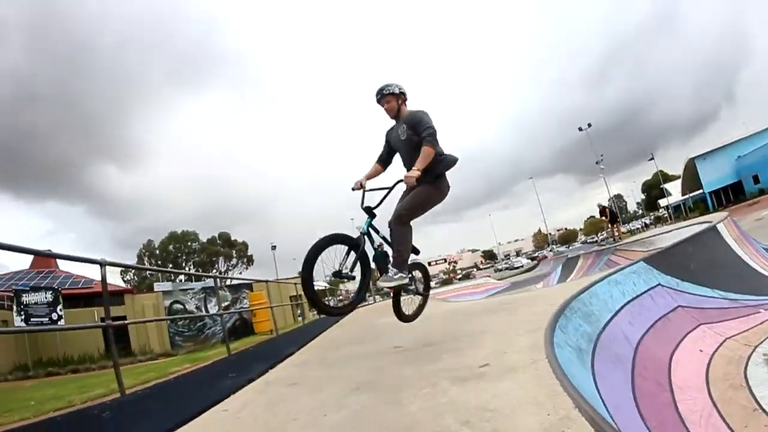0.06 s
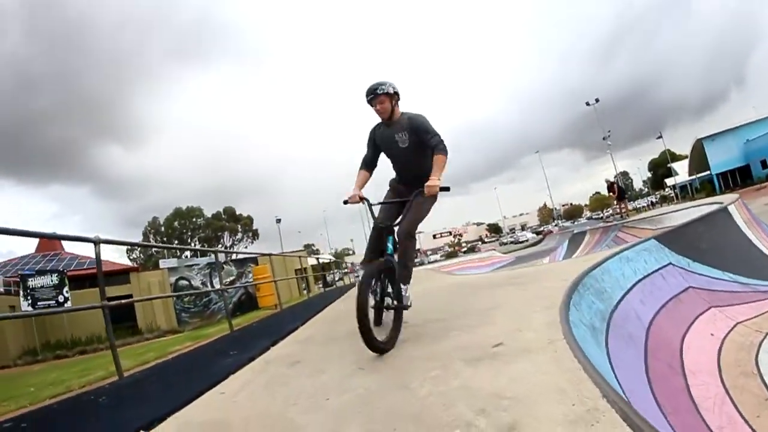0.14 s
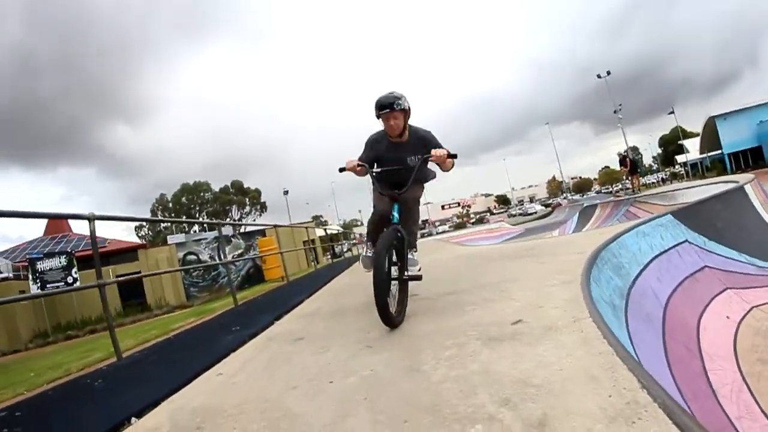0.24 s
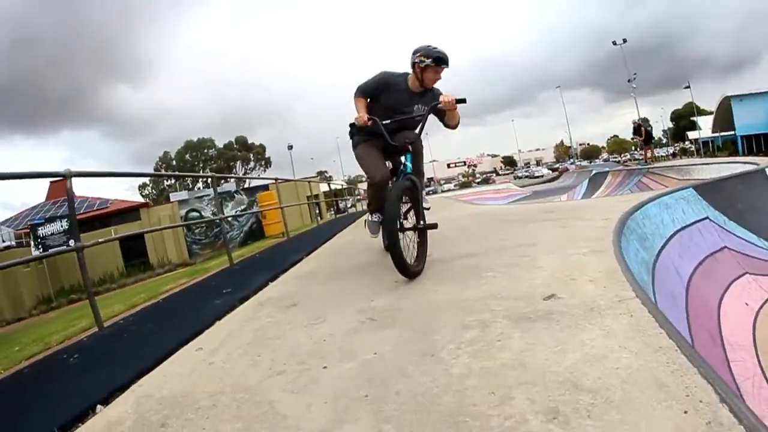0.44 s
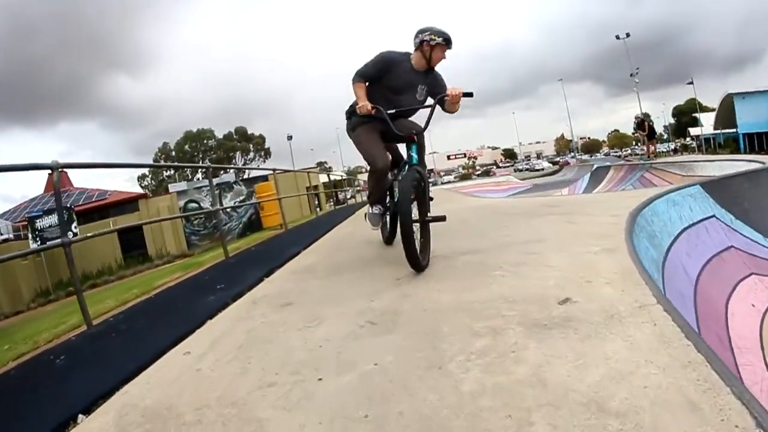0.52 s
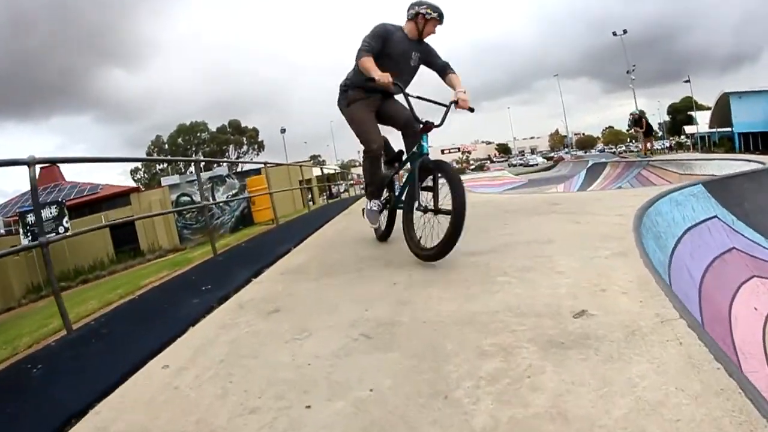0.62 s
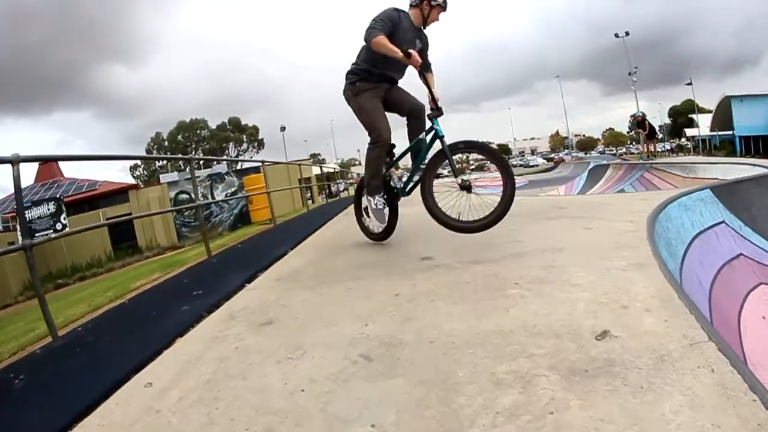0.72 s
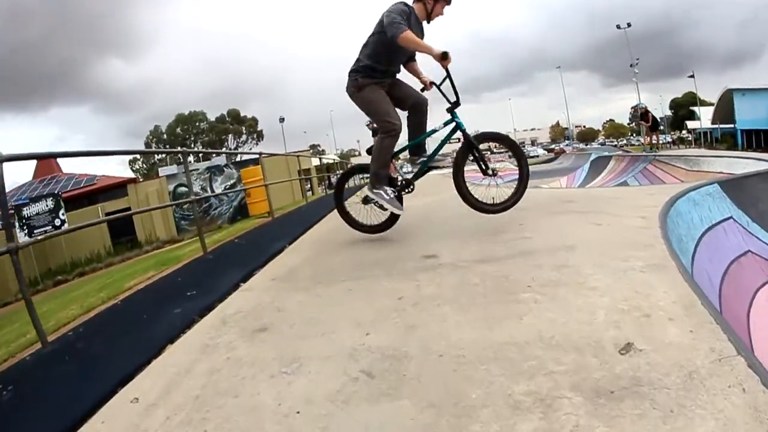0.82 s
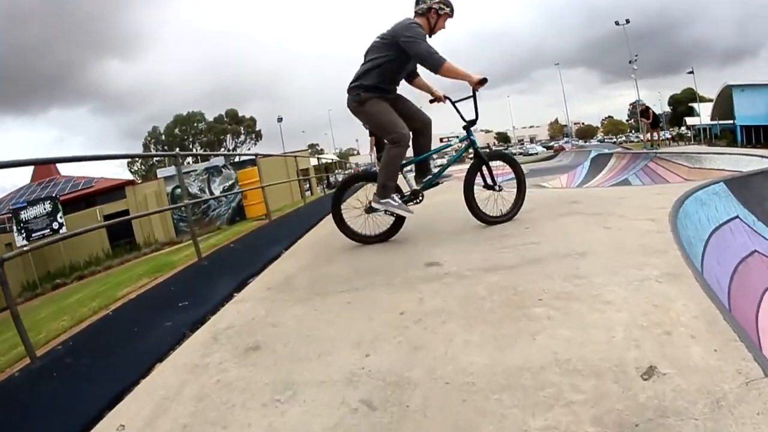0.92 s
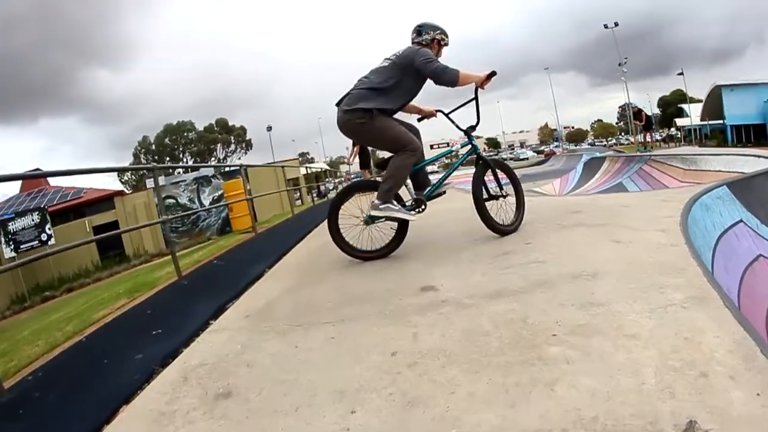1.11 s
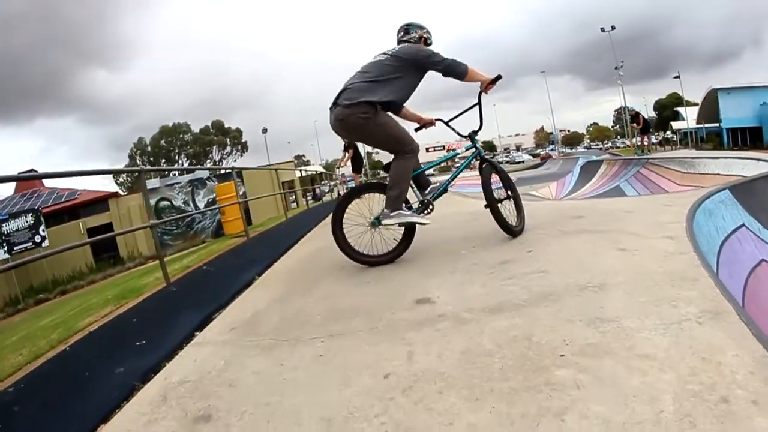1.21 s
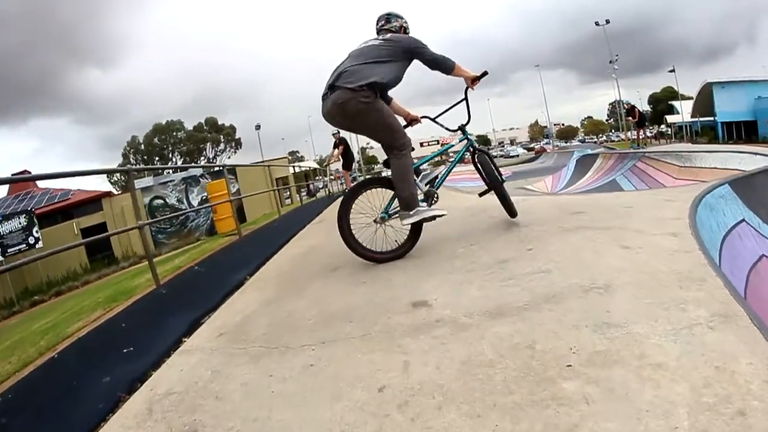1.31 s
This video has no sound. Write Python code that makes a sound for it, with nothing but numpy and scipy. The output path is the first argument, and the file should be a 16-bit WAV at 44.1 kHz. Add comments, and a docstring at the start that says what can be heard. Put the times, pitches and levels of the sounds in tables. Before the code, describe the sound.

Hard tyre landing with a rubbery chirp, preceded by freewheel clicking, followed by light frame ticks

```python
"""A bicycle freewheel buzzes and slows, then starts again, as a small bike hops about on a concrete skatepark.
Each ratchet tooth is a short filtered noise rattle with a fainter hub ring. Tyres land with pulse slaps,
a thump of dying sines and a fading noise scuff; rubber squeals are wobbling tones mixed with grit.
The frame ticks and rings in noise pings and dying sines. Below lie lumpy noise for air, tread hiss
and rolling rumble, and a faint far hum that fades."""
import sys
import numpy as np
from scipy import signal
from scipy.fft import rfft, irfft
from scipy.io import wavfile
from scipy.ndimage import uniform_filter1d

SR = 44100
rng = np.random.default_rng(int(sys.argv[2]) if len(sys.argv) > 2 else 0)


def boost_factor(decibels):
    """Convert a level in decibels to a linear amplitude factor."""
    exponent = np.asarray(decibels, float) / 20
    return 10 ** exponent


def dump(signal):
    """Clip the signal to [-1, 1] and save it as 16-bit WAV at the path in sys.argv[1]."""
    limited = np.clip(np.atleast_2d(signal).T, -1, 1)
    pcm = np.round(limited * 32767).astype(np.int16)
    wavfile.write(sys.argv[1], SR, pcm)


N = 59535  # length in samples


def read(points, hz):
    """Table value on a log-frequency axis."""
    f, value = np.transpose(points)
    return np.interp(np.log(hz + 1), np.log(f + 1), value)


def follow(curve, s):
    """Value at a time, on straight lines between the points of a (seconds, value) table."""
    return np.interp(s, *np.transpose(curve))


def add(mix, s, sound):
    """Mixes a sound in at a time, cut where it passes either end."""
    at = round(s * SR)
    part, sound = mix[max(at, 0):], sound[max(-at, 0):]
    part[:len(sound)] += sound[:len(part)]


def colour(x, shape_db):
    """Filters by a dB function of frequency, to rms 1."""
    gain = boost_factor(shape_db(np.fft.rfftfreq(len(x), 1 / SR)))
    y = irfft(rfft(x) * gain, len(x))
    return y / np.sqrt(np.mean(y ** 2))


def lumpiness(size, corner_hz):
    """Slow random drift of rms 1: noise that falls away above the corner."""
    return colour(rng.standard_normal(size), lambda f: -10 * np.log10(1 + (f / corner_hz) ** 4))


def burst(shape_db, t60s, size, order=1):
    """Noise with a near-instant start, each band dying at its own speed; order 2 bends the decay."""
    noise = colour(rng.standard_normal(size), shape_db)
    t, hz_axis = np.arange(size) / SR, np.fft.rfftfreq(size, 1 / SR)
    out = 0
    for k, (hz, t60) in enumerate(t60s):
        # overlapping bands: each is full at its own frequency and gone at its neighbours'
        share = read([(f, j == k) for j, (f, _) in enumerate(t60s)], hz_axis)
        out = out + irfft(rfft(noise) * share, size) * boost_factor(-60 * (t / t60) ** order)
    return out * np.minimum(t / 0.00027, 1)


def ring(modes_hz, modes, tilt_db=0, order=1):
    """Dying sines that swell over their first cycles, tilted in dB per octave from the first mode."""
    swell_cycles, swell_most_s = 2.6, 0.014
    t, out = np.arange(8192) / SR, 0
    for hz, (db, t60) in zip(modes_hz, modes):
        level = db + tilt_db * np.log2(hz / modes_hz[0])
        decay = boost_factor(level - 60 * (t / t60) ** order)
        swell = (1 - np.exp(-t / min(swell_cycles / hz, swell_most_s))) ** 2
        out = out + decay * swell * np.sin(2 * np.pi * hz * t)
    return out


def bed(spectrum, curve, lumps_db, lump_s):
    """Coloured noise along a level curve, made uneven by slow random lumps (rms in dB)."""
    lumps = lumpiness(N, 1 / lump_s)
    noise = colour(rng.standard_normal(N), lambda f: read(spectrum, f))
    return noise * boost_factor(follow(curve, np.arange(N) / SR) + lumps_db * lumps)


# Spells of coasting, a list of rows for each. Each row: time in seconds, ratchet teeth passed so far.
RATCHET_TEETH = [
    [(-.0025, 0), (.0608, 9), (.1109, 15), (.1441, 18), (.1775, 20), (.1915, 21)],
    [(1.1918, 0), (1.218, 1), (1.2338, 2), (1.2694, 5), (1.3281, 11), (1.3399, 12)],
]
# Strength of the pawl clicks. Each row: time in seconds, level in dB before random spread.
PAWL_STRENGTH = [(.055, -46), (.11, -48.5), (.19, -57), (1.19, -55.5), (1.23, -47.5), (1.35, -46.5)]
# Tone of the clicks. Each row: frequency in Hz, relative level in dB per Hz.
PAWL_SPECTRUM = [(900, -32.5), (1400, -13), (2330, -3.5), (2900, -8), (3850, -0.5), (4700, -12.5),
                 (5800, -16), (11000, -10)]
# Decay of the pawl rattle. Each row: frequency in Hz, t60 in seconds.
PAWL_DECAY = [(2000, .016), (8000, .011)]
# Decay of the hub shell. Each row: frequency in Hz, t60 in seconds.
HUB_DECAY = [(3000, .1), (8000, .055)]
# Moving resonance near the hub. Each row: time in seconds, centre in Hz, boost or cut in dB.
HUB_RESONANCE = [(.03, 2270, 7), (0.084, 2350, -4.5), (.108, 1735, 17.5), (.15, 2050, 1)]


def freewheel():
    """Every passing tooth drops the pawls: one short rattle, and a fainter ring of the hub shell."""
    spread_db, slip_s, detune = 1.5, .0002, .06  # random scatter from click to click, standard deviations
    peak_octaves, hub_db = .13, -5
    peak_s, peak_hz, peak_db = np.transpose(HUB_RESONANCE)
    out = np.zeros(N)
    for spell in RATCHET_TEETH:
        s, teeth = np.transpose(spell)
        for at in np.interp(np.arange(teeth[-1] + 1), teeth, s):
            luck, slip, pitch = rng.standard_normal(3)
            db = follow(PAWL_STRENGTH, at) + spread_db * luck
            centre_hz, boost_db = np.interp(at, peak_s, peak_hz), np.interp(at, peak_s, peak_db)

            def peak(f):
                return boost_db * np.exp(-(np.log2((f + 1) / centre_hz) / peak_octaves) ** 2)

            def pawl_shape(f):
                return read(PAWL_SPECTRUM, f * (1 + detune * pitch)) + peak(f)

            def hub_shape(f):
                return read(PAWL_SPECTRUM, f) + peak(f)

            rattle = burst(pawl_shape, PAWL_DECAY, size=4096, order=2)
            hub = burst(hub_shape, HUB_DECAY, size=4096)
            add(out, at + slip_s * slip, boost_factor(db) * (rattle + boost_factor(hub_db) * hub))
    return out


# Park air. Each row: frequency in Hz, relative level in dB per Hz.
AIR_SPECTRUM = [(200, -18.5), (390, -5.5), (2000, -17.5), (16000, -39)]


def park_air():
    """Wind and open air: lumpy noise around a constant level of -65 dB."""
    return bed(AIR_SPECTRUM, [(0, -65)], lumps_db=2.0, lump_s=0.049)


# Tone of the tyre hiss. Each row: frequency in Hz, relative level in dB per Hz.
TREAD_SPECTRUM = [(300, -4), (2000, -8), (4600, -14), (5500, -22)]
# Rise and fall of the tyre hiss. Each row: time in seconds, level in dB before the lumps.
TREAD_LEVEL = [(.2, -67), (.35, -60.5), (.52, -69.5), (.62, -62.5), (0.741, -63), (0.781, -78), (.92, -96),
               (1.001, -54.5), (1.1, -66.5)]


def tread_hiss():
    """Hiss of the tyre tread: lumpy noise that swells and fades."""
    return bed(TREAD_SPECTRUM, TREAD_LEVEL, lumps_db=3.0, lump_s=0.018)


# Tone of the rolling rumble. Each row: frequency in Hz, relative level in dB per Hz.
RUMBLE_SPECTRUM = [(20, -21), (50, -6), (110, -2.5), (200, -12), (290, -14), (500, -53)]
# Rise and fall of the rumble. Each row: time in seconds, level in dB before the lumps.
RUMBLE_LEVEL = [(0.081, -56), (0.301, -53.5), (.55, -61.5), (.68, -54.5), (0.829, -52.5), (0.919, -56),
                (1.029, -52), (1.35, -62.5)]


def rolling_rumble():
    """Low rumble of rolling: lumpy noise that swells and fades."""
    return bed(RUMBLE_SPECTRUM, RUMBLE_LEVEL, lumps_db=3.0, lump_s=0.046)


# Fade of the hum. Each row: time in seconds, peak level in dB.
HUM_LEVEL = [(.6, -66), (.95, -76)]


def far_hum():
    """A faint far hum: one steady 399 Hz sine that fades."""
    t = np.arange(N) / SR
    return np.sin(2 * np.pi * 399 * t) * boost_factor(follow(HUM_LEVEL, t))


# Slaps of the tread. Each row: start in seconds, level in dB, width in seconds, push +1 or pull -1.
TREAD_SLAPS = [(.2090, -28, .00012, 1), (.2105, -21, .00018, 1), (.2106, -9, .00002, 1),
               (.9333, -30, .000035, 1), (.9352, -29, .0002, -1), (.9719, -18, .000045, -1),
               (.9722, -31, .0004, 1)]


def slaps():
    """The tread slaps the concrete: a bell-shaped pressure pulse, then a slower swing the other way."""
    rebound = 2.8  # time constant of the return swing, in pulse widths
    out = np.zeros(N)
    for s, db, width, sign in TREAD_SLAPS:
        u = np.arange(1024) / SR / width
        pulse = np.exp(-(u - 2) ** 2 / 2)
        swing_back = np.sqrt(2 * np.pi) * u / rebound ** 2 * np.exp(-u / rebound)
        add(out, s, sign * boost_factor(db) * (pulse - swing_back))
    return out


# Tyre landings. Each row: start in seconds, thump level in dB, scuff level in dB, thump tilt in dB per octave.
TYRE_LANDINGS = [(0.2103, -18, -32, 0.6), (0.932, -35, -46, -2), (0.9715, -31.5, -48.5, -3)]
# Pitches of the tyre carcass, in Hz.
CARCASS_PITCHES = [124, 268, 400, 615, 770, 1320]
# Their strengths, in the same order. Each row: relative level in dB before the tilt, t60 in seconds.
CARCASS_MODES = [(5.5, 0.042), (9.5, 0.017), (1, 0.014), (4.5, 0.013), (2.5, 0.011), (-3, 0.009)]
# Tone of the scuff. Each row: frequency in Hz, relative level in dB per Hz.
SCUFF_SPECTRUM = [(35, -28.5), (90, 4.5), (350, 4), (890, -10.5), (1700, -8.5), (6000, -15.5), (16000, -35)]
# Decay of the scuff. Each row: frequency in Hz, t60 in seconds.
SCUFF_DECAY = [(150, 0.14), (1500, 0.35), (6000, 0.16), (12000, 0.31)]


def thumps_and_scuffs():
    """The tyre carcass thumps in its modes, under a fading noise scuff that breaks up."""
    lumps_db, lumps_hz = 1.8, 90
    out = np.zeros(N)
    for s, thump_db, scuff_db, tilt_db in TYRE_LANDINGS:
        add(out, s, boost_factor(thump_db) * ring(CARCASS_PITCHES, CARCASS_MODES, tilt_db, order=2))
        scuff = burst(lambda f: read(SCUFF_SPECTRUM, f), SCUFF_DECAY, size=16384)
        add(out, s, boost_factor(scuff_db) * scuff * boost_factor(lumps_db * lumpiness(16384, lumps_hz)))
    return out


# Rubber squeals. Each row: start in seconds, length in seconds, pitch in Hz before the wobble and sag,
# level in dB, roughness from 0 to 1, step per overtone in dB.
RUBBER_SQUEALS = [(0.2105, 0.0058, 6350, -15, 0.7, -6.5), (0.28, 0.014, 6700, -59, 0.24, -34),
                  (0.9712, 0.0069, 4524, -41, 0.71, -37), (1.0252, 0.0074, 5400, -51.5, 0.4, -3)]


def squeals():
    """Stick and slip of rubber: a wobbling tone with overtones, mixed with grit and scattered by the park."""
    wobble_share, sag_share = .2, 0.12  # shares of the pitch before smoothing, both scaled by roughness
    grit_low_hz, grit_tilt_db = 3600, -9  # low cut; dB per octave away from the pitch
    echo_db, echo_t60 = -20.5, 0.039
    t, out = np.arange(1024) / SR, np.zeros(N)
    for s, length, hz, db, rough, step_db in RUBBER_SQUEALS:
        wobble, grit = rng.standard_normal((2, 1024))
        wobble = wobble_share * uniform_filter1d(wobble, size=30)
        sag = sag_share * np.sin(np.pi * t / length)  # the pitch dips mid-squeal
        phase = 2 * np.pi * np.cumsum(hz * (1 + rough * (wobble - sag))) / SR
        tone = sum(boost_factor(k * step_db) * np.sin((k + 1) * phase) for k in range(3))

        def grit_shape(f):
            low_cut = -10 * np.log10(1 + (grit_low_hz / (f + 1)) ** 12)
            return low_cut + grit_tilt_db * abs(np.log2((f + 1) / hz))

        grit = colour(grit, grit_shape)
        edge = .0006 + (1 - rough) * length * 0.12  # fade in and out, seconds
        shape = np.clip(np.minimum(t, length - t) / edge, 0, 1)
        add(out, s, boost_factor(db) * shape * (np.sqrt(2 - 2 * rough ** 2) * tone + rough * grit))
    echo = burst(np.zeros_like, [(1, echo_t60)], size=8192)
    scattered = signal.fftconvolve(out, echo / np.linalg.norm(echo))[:N]
    return out + boost_factor(echo_db) * scattered


# Blows on the frame. Each row: start in seconds, level in dB, tilt in dB per octave.
FRAME_KNOCKS = [(0.304, -50, -8), (1.028, -82, 9.5), (1.0375, -53.5, -3)]
# Pitches of the frame tubes, in Hz.
FRAME_PITCHES = [1744, 2035, 2654, 3430, 5136, 10260]
# Their strengths, in the same order. Each row: relative level in dB before the tilt, t60 in seconds.
FRAME_MODES = [(8.5, 0.037), (2.5, 0.11), (0, 0.095), (3.5, 0.09), (4, 0.082), (-6, 0.1)]


def knocks():
    """Blows that ring the frame tubes in their modes."""
    out = np.zeros(N)
    for s, db, tilt_db in FRAME_KNOCKS:
        add(out, s, boost_factor(db) * ring(FRAME_PITCHES, FRAME_MODES, tilt_db))
    return out


# Ticks of chain and frame. Each row: start in seconds, level in dB, centre in Hz, t60 of the noise in seconds.
CHAIN_TICKS = [(0.3306, -54.5, 4750, 0.056), (.411, -62.5, 4800, 0.073), (0.4387, -58.5, 4200, 0.052),
               (0.4855, -61.5, 6000, 0.069), (0.4972, -70, 7000, 0.0099), (0.547, -57, 2095, 0.014),
               (0.661, -51, 1920, 0.088), (0.7134, -50.5, 2830, 0.035), (0.862, -61, 4070, 0.015),
               (1.0054, -51, 4070, 0.023), (1.1354, -66.5, 9120, 0.021)]
# Short ping at the centre pitch, one row: level in dB relative to the tick, t60 in seconds.
TICK_PING = (6, .016)


def ticks():
    """Dry ticks of chain and frame: noise gathered around a pitch, and a short ping on it."""
    slope_db = -14.5  # per octave from the centre
    out = np.zeros(N)
    for s, db, hz, t60 in CHAIN_TICKS:
        noise = burst(lambda f: slope_db * abs(np.log2((f + 1) / hz)), [(hz, t60)], size=4096)
        add(out, s, boost_factor(db) * noise)
        add(out, s, boost_factor(db) * ring([hz], [TICK_PING]))
    return out


def scene():
    """All sources summed to one channel."""
    background = park_air() + tread_hiss() + rolling_rumble() + far_hum()
    landings = slaps() + thumps_and_scuffs()
    bike = freewheel() + landings + squeals() + knocks() + ticks()
    return (background + bike)[None]


def band_limit(x):
    """A steep low-pass at the top of the band."""
    return signal.sosfilt(signal.butter(12, 16400, fs=SR, output="sos"), x)


def record(dry):
    """Band limits of the microphone: a gentle low cut at 40 Hz, a steep high cut at 15.5 kHz."""
    low_cut = signal.butter(2, 40, "high", fs=SR, output="sos")
    high_cut = signal.butter(12, 15500, fs=SR, output="sos")
    mix = signal.sosfilt(high_cut, signal.sosfilt(low_cut, dry))
    return band_limit(mix)


dry = scene()
out = record(dry)
dump(out)
```